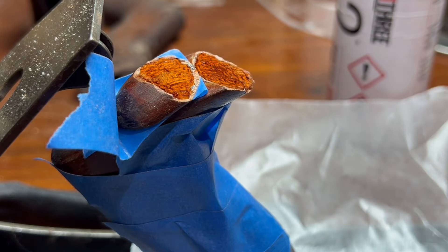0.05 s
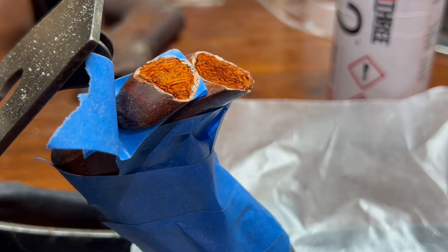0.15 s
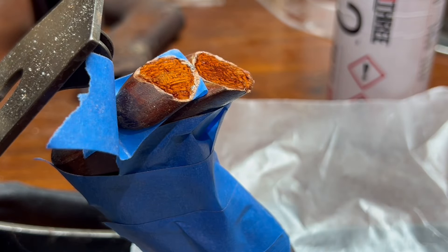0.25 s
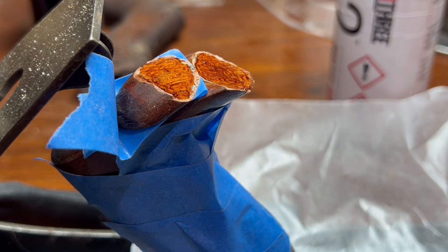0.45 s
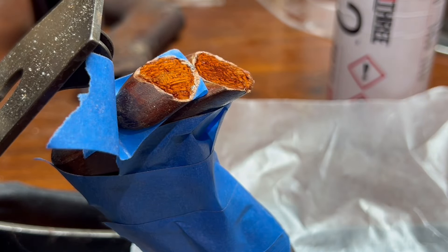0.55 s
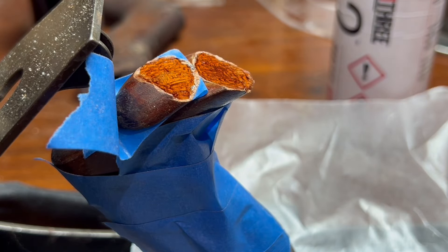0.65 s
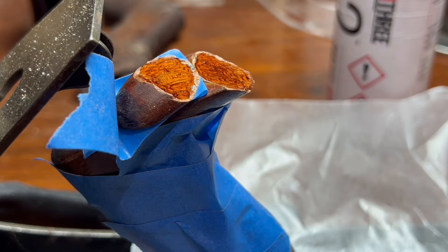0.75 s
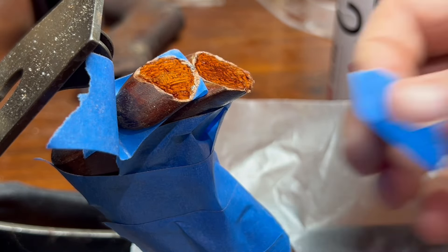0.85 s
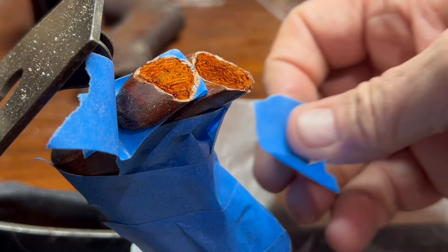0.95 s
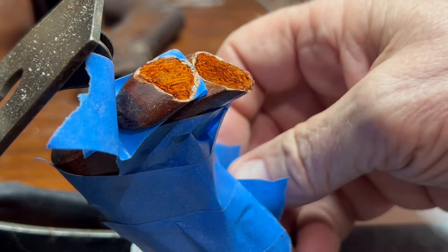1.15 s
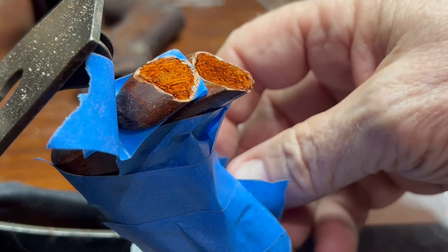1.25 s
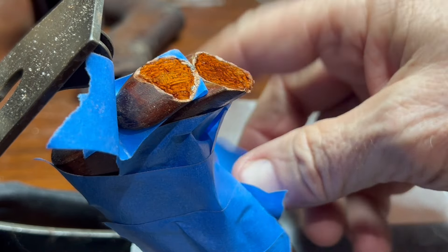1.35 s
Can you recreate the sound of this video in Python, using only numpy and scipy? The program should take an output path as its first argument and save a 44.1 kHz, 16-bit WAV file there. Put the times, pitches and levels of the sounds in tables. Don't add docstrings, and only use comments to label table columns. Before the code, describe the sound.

Tape peeling and pressing with sharp sticky ticks, following a hard wooden clatter with faint steel clinks

```python
import sys
import numpy as np
from scipy import signal
from scipy.fft import rfft, irfft, next_fast_len
from scipy.io import wavfile
from scipy.ndimage import uniform_filter1d

SR = 44100
rng = np.random.default_rng(int(sys.argv[2]) if len(sys.argv) > 2 else 0)


def volts(x):
    e = np.asarray(x, float) / 20
    return 10 ** e


def store_wav(level_fs):
    pcm = np.round(np.clip(np.atleast_2d(level_fs), -1, 1) * 32767)
    wavfile.write(sys.argv[1], SR, pcm.T.astype(np.int16))


N = 61739


def evened(x):
    return x / np.sqrt(np.mean(x ** 2) + 1e-20)


def read(points, hz):
    f, value = np.transpose(points)
    return np.interp(np.log(hz + 1), np.log(f + 1), value)


def add(mix, start_s, sound):
    part = mix[round(start_s * SR):][:len(sound)]
    part += sound[:len(part)]


def colour(x, db_at):
    size = next_fast_len(2 * x.shape[-1])
    gain = volts(db_at(np.fft.rfftfreq(size, 1 / SR)))
    return irfft(rfft(x, size) * gain, size)[..., :x.shape[-1]]


def resonate(x, hz, width_hz):
    turn = np.exp(2j * np.pi * hz * np.arange(x.shape[-1]) / SR)
    r = np.exp(-np.pi * width_hz / SR)
    return 2 * (turn * signal.lfilter([1 - r], [1, -r], x / turn)).real


def ring(modes, tilt_db, luck, rise_cycles, cap_s, detune):
    t = np.arange(SR // 3) / SR
    hz, db, t60_s = np.transpose(modes)[..., None]
    hz = hz * (1 + detune * luck[14:14 + len(modes), None])
    level_db = db + tilt_db * np.log2(hz / 1500) + 3.9 * luck[:len(modes), None]
    decay = volts(level_db - 60 * t / np.minimum(t60_s, cap_s))
    rise = 1 - np.exp(-t * hz / rise_cycles)
    x = (decay * rise * np.sin(2 * np.pi * hz * t)).sum(0)
    return x / abs(x).max()


def stereo_noise(u, v, db_at):
    # pitch_hz, coherence
    likeness = [(60, 0.78), (240, 0.97), (950, 0.42), (3770, 1), (15000, 1)]

    def same(hz):
        return np.clip(read(likeness, hz), .02, .995)

    mid = colour(u, lambda hz: db_at(hz) + 10 * np.log10(1 + same(hz)))
    side = colour(v, lambda hz: db_at(hz) + 10 * np.log10(1 - same(hz)))
    return evened(np.array([mid + side, mid - side]))


def workshop_air():
    # pitch_hz, level_db (per Hz)
    hum_spectrum = [(25, -30.5), (70, -18), (150, 0.5), (500, -14.5), (850, -18.5), (1500, -35.5)]
    # pitch_hz, level_db (per Hz)
    hiss_spectrum = [(600, -30.5), (1000, -2.5), (3000, -9.5), (5200, -9), (5800, -17.5), (16000, -26)]
    # pitch_hz, width_hz, level_db
    drone_bands = [(112.9, 22, -67), (169, 8.8, -72.5), (232, 14, -77.5), (473, 15, -87.5)]
    # time_s, level_db
    handling = [(0.0, -69.5), (0.166, -71), (0.28, -80.5), (0.49, -73), (0.688, -78.5), (0.844, -67.5),
                (1.172, -75), (1.4, -71.5)]
    hum_db, hiss_db = -70.5, -82.5
    a, b, c, d = rng.standard_normal((4, N))
    time_s, level_db = np.transpose(handling)
    swell = volts(np.interp(np.arange(N) / SR, time_s, level_db - level_db.mean()))
    hum = stereo_noise(a, b, lambda hz: read(hum_spectrum, hz) - 12 * np.log2(np.maximum(hz / 1500, 1)))
    hiss = stereo_noise(
        c, d, lambda hz: read(hiss_spectrum, hz) + 12 * np.log2(np.minimum(hz / 1000, 1) + .001))
    drones = np.zeros(N)
    for (hz, width_hz, db), noise in zip(drone_bands, rng.standard_normal((len(drone_bands), N))):
        drones += volts(db) * evened(resonate(resonate(noise, hz, width_hz), hz, 1.6 * width_hz))
    return volts(hum_db) * swell * hum + volts(hiss_db) * hiss + drones


def whine():
    # start_s, end_s, pitch_hz, width_hz, level_db
    spells = [
        (.06, 0.23, 4620, 450, -86),
        (0.459, 0.565, 4602, 170, -82.5),
        (0.558, 0.665, 4900, 220, -86),
        (0.804, 1.044, 4740, 800, -85),
    ]
    out = np.zeros(N)
    for (start_s, end_s, hz, width_hz, db), noise in zip(spells, rng.standard_normal((len(spells), SR // 3))):
        noise = noise[:int((end_s - start_s) * SR)]
        fade = signal.windows.tukey(len(noise), .4)
        tone = evened(resonate(resonate(noise, hz, width_hz), hz, 2 * width_hz))
        add(out, start_s, volts(db) * fade * tone)
    return out


def room(x):
    # pitch_hz, t60_s
    decay_times = [(125, 0.37), (500, 0.24), (2000, 0.25), (6000, 0.21), (14000, 0.24)]
    side_gain = 0.46
    echoes = np.zeros((2, SR))
    at = np.arange(120, SR - 20, 20) + rng.integers(0, 20, (2, (SR - 121) // 20))
    np.put_along_axis(echoes, at, rng.choice([-1., 1.], at.shape), 1)
    hz, t, z = signal.stft(echoes, SR, nperseg=256)
    decay = volts(-60 * t / read(decay_times, hz)[:, None])
    mid, side = signal.istft(z * decay, SR, nperseg=256)[1]
    side = side_gain * colour(side, lambda hz: 6.0 * np.log2(np.minimum(hz / 700, 1) + .01)
                              - 2.8 * np.log2(np.maximum(hz / 1500, 1)))
    response = np.array([mid + side, mid - side]) / np.linalg.norm(mid)
    return signal.fftconvolve(x[None], response, axes=1)[:, :N]


def rustles():
    # start_s, peak_s, end_s, level_db, brightness_db (per octave)
    strokes = [(-.02, .0, 0.17, -73, 2.5), (0.549, 0.567, .575, -58.5, 0), (.575, 0.584, .592, -57, 5),
               (0.648, 0.679, .690, -44.5, 5.5), (0.77, 0.782, .805, -59.5, 5),
               (0.744, 0.888, 0.92, -70.5, -4.5), (0.904, 0.938, .950, -55.5, -19),
               (0.95, .962, 1.03, -78, 6.5), (.98, 1.028, 1.04, -72, 2), (1.055, 1.055, 1.085, -72, 3),
               (1.124, 1.144, 1.152, -68, -5), (1.143, 1.161, 1.20, -68, -2.5),
               (1.09, 1.266, 1.46, -69.5, 8.5), (1.267, 1.360, 1.42, -58.5, 0.5)]
    # pitch_hz, width_hz, level_db
    sheet_modes = [(4600, 1500, 0), (10660, 1500, 3), (13790, 1400, 5), (15700, 430, 3)]
    ticks_per_s, spread_db = 17000, 2.5
    t, out = np.arange(N) / SR, np.zeros(N)
    sizes = volts(spread_db * rng.exponential(1, N))
    ticks = sizes * (rng.random(N) < ticks_per_s / SR) * rng.standard_normal(N)
    flat = colour(ticks, lambda hz: 12 * np.log2(np.minimum(hz / 3200, 1) + 0.012))
    ringing = sum(volts(db) * resonate(flat, hz, width_hz) for hz, width_hz, db in sheet_modes)
    sheet = evened(flat) + 0.47 * evened(ringing)
    for start_s, peak_s, end_s, db, bright in strokes:
        rise = (t - start_s) / (peak_s - start_s)
        fall = (end_s - t) / (end_s - peak_s)
        shape = np.clip(np.minimum(rise, fall), 0, 1) ** 2.2
        out += volts(db) * shape * evened(colour(sheet, lambda hz: bright * np.log2(hz / 8000 + 0.05)))
    return out


def snaps():
    # start_s, level_db, pitch_hz, burst_s
    releases = [(.2280, -49, 13000, 0.003), (.5610, -54, 10500, .001), (.5655, -49, 4000, 0.0012),
                (.6612, -52.5, 11810, .001), (.6792, -36, 11000, 0.0011), (.6805, -51.5, 3750, 0.0011),
                (.8885, -41, 5000, 0.00075), (.8922, -35.5, 4600, 0.00077), (.9165, -40, 7400, .001),
                (.9345, -36, 4864, 0.0017), (.9592, -53.5, 4500, .002), (1.0600, -66, 2080, 0.0049),
                (1.2670, -60.5, 10130, .001), (1.3615, -41, 9900, 0.0011), (1.3650, -34.5, 10100, 0.0022),
                (1.3745, -72, 9900, 0.0009)]
    brightness = [3.5, 0, 4, 7, 5.5, 3, 0, -1.5, -2.5, -1, -1.5, -7.5, 1.5, -3, 0, 1]
    # pitch_hz, level_db (per Hz)
    spectrum = [(400, -36), (950, -14), (1800, -18.5), (2600, -7.5), (4900, -3.5), (6000, -5.5),
                (10000, -6.5), (16000, -10)]
    pitch_db, pitch_q = -3.5, 3.55
    out, t = np.zeros(N), np.arange(800) / SR
    noises = rng.standard_normal((len(releases), 800))
    for (start_s, db, hz, burst_s), bright, noise in zip(releases, brightness, noises):
        rise = np.minimum(t / (0.39 * burst_s), 1)
        burst = noise * rise * (np.exp(-t / burst_s) + 0.11 * np.exp(-t / 0.0065))
        broad = evened(colour(burst, lambda f: read(spectrum, f) + bright * np.log2(f / 6000 + .05)))
        width_hz = hz / pitch_q
        pitched = evened(resonate(resonate(burst, hz, width_hz), hz, width_hz))
        y = broad + volts(pitch_db - bright) * pitched
        add(out, start_s, volts(db + 4) * y / abs(y).max())
    return out


def booms():
    # pitch_hz, level_db, t60_s
    top_modes = [(106.1, -0.5, .2), (171.8, 0.5, .2)]
    # start_s, level_db, tilt_db (per octave)
    blows = [
        (.2320, -30.5, 3.5),
        (.2950, -33, -3),
        (1.3150, -59.5, -12),
    ]
    out = np.zeros(N)
    for start_s, db, tilt_db in blows:
        hum = ring(top_modes, tilt_db, np.zeros(30), rise_cycles=3.0, cap_s=1, detune=0)
        add(out, start_s, volts(db) * hum)
    return out


def knocks():
    # start_s, level_db, hardness_db (per octave), thud_db, clink_db
    bounces = [(0.1968, -38.5, -6, -42.5, -64), (.2070, -47, -5, -41.5, -75.5),
               (0.2305, -18, 1, -36, -50.5), (0.2343, -17.5, -2, -33, -58.5), (.2500, -30, -2, -30.5, -76),
               (.2750, -42.5, 8, -45, -44), (.2890, -26, 2.5, -45, -32), (0.2979, -44, 3, -42, -45),
               (.3140, -32, -3, -42.5, -54), (.3200, -24.5, 2.5, -41, -36.5), (0.335, -29, -5, -60, -59.5),
               (.3385, -36.5, -3, -52.5, -59.5), (0.3771, -40.5, 10.5, -56.5, -50),
               (.4560, -62, 4.5, -69, -77), (.6800, -75, 6.5, -59, -90), (.9580, -69, -5, -58, -91)]
    # pitch_hz, level_db, t60_s
    wood_modes = [(515, 4, 5.0), (721, -1.5, 0.14), (896.7, 1.5, 0.11), (1015, 0.5, 0.28),
                  (1359, 3.5, 0.094), (2246, -7.5, 0.11), (2708, -8.5, 0.062), (3246, -9, 0.23),
                  (3672, -6, 0.25), (4820, -24, 0.27), (5367, -17.5, 0.064), (5860, -27.5, 5.0)]
    # pitch_hz, level_db, t60_s
    bench_modes = [(223.5, -5.5, .1), (297, -5.5, 0.061), (420.2, 0, .07), (524.6, -0.5, .07),
                   (634, -4.5, .05)]
    # pitch_hz, width_hz, level_db
    steel_bands = [(11840, 250, -1.5), (13500, 700, -1.5), (12800, 320, -5), (9050, 1500, -5.5)]
    crack_s, crack_top_hz, clink_s = 0.0038, 6400, .004
    out, t = np.zeros(N), np.arange(1500) / SR
    for (start_s, db, hard, thud_db, clink_db), luck in zip(bounces, rng.standard_normal((len(bounces), 3060))):
        burst = luck[60:1560] * np.minimum(t / 0.0011, 1) * np.exp(-t / crack_s)
        crack = colour(burst, lambda hz: (hard - 1.5) * np.log2(hz / 2000 + 0.074)
                       - 30 * np.log2(np.maximum(hz / crack_top_hz, 1)))
        wood = ring(wood_modes, hard + 2.4, luck, rise_cycles=0.94, cap_s=.016, detune=.05)
        thud = ring(bench_modes, 0, luck[30:], rise_cycles=0.4, cap_s=.6, detune=.04)
        jolt = luck[1560:] * np.minimum(t / 0.0012, 1) * (np.exp(-t / clink_s) + 0.12 * np.exp(-t / .015))
        clink = sum(volts(d) * evened(resonate(jolt, hz, width_hz)) for hz, width_hz, d in steel_bands)
        clink = clink + 1.2 * evened(np.diff(jolt, prepend=0))
        add(out, start_s, volts(db - 1) * crack / abs(crack).max())
        add(out, start_s, volts(db + 3.5) * wood)
        add(out, start_s, volts(thud_db) * thud)
        add(out, start_s - .001, volts(clink_db + 7) * clink / abs(clink).max())
    return out


def ports(x):
    # pitch_hz, level_db
    level_gap = [(60, 0.013), (240, 0.5), (950, 1.5), (3770, 1.0), (15000, 0.017)]
    # pitch_hz, phase_rad
    phase_gap = [(150, -.05), (450, -.5), (1200, -.9), (2600, -.4), (5000, -0.43), (15000, -.2)]
    hz = np.fft.rfftfreq(N, 1 / SR)
    half = volts(read(level_gap, hz) / 2) * np.exp(.5j * read(phase_gap, hz))
    return irfft(rfft(x) * np.array([half, 1 / half]), N)


def scene():
    knock_room_db, tape_room_db = -9, -16
    tool = knocks()
    tape = snaps() + rustles()
    scatter = 0.55 + evened(uniform_filter1d(rng.standard_normal(N), size=100))
    scattered = tool * scatter / 1.174
    wet = room(volts(knock_room_db) * scattered + volts(tape_room_db) * tape)
    return ports(tool) + booms() + tape + wet + workshop_air() + whine()


def roll_off(x):
    return signal.sosfilt(signal.butter(12, 16970, fs=SR, output="sos"), x)


def record(dry):
    limit, low_cut_hz, top_hz = .4, 95, 15900
    held = limit * np.tanh(dry / limit)
    heard = colour(held, lambda hz: 18 * np.log2(np.clip(hz / low_cut_hz, .6, 1)) - 30 * (hz > top_hz))
    return roll_off(heard)


dry = scene()
out = record(dry)
store_wav(out)
```